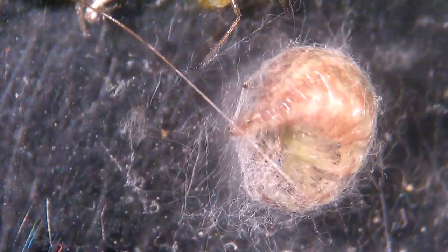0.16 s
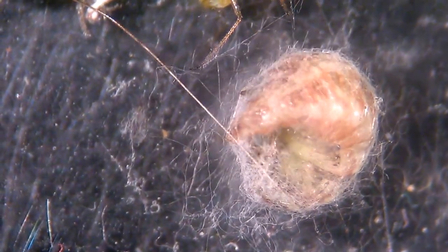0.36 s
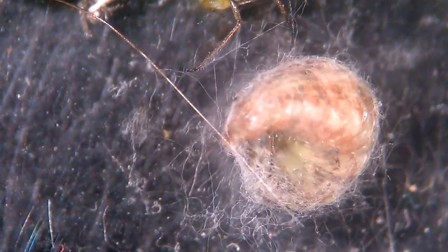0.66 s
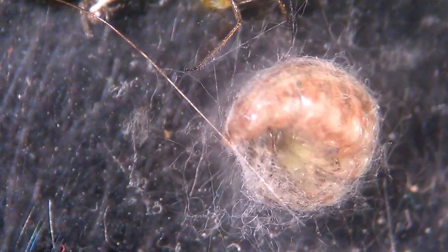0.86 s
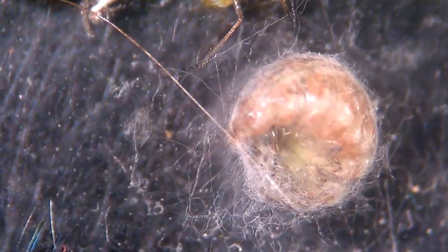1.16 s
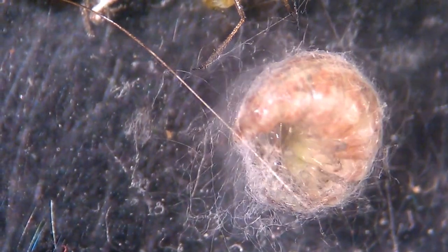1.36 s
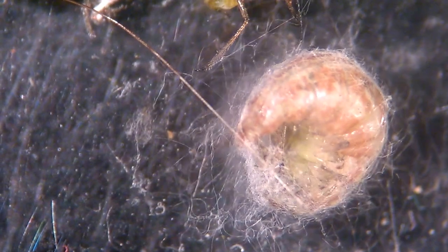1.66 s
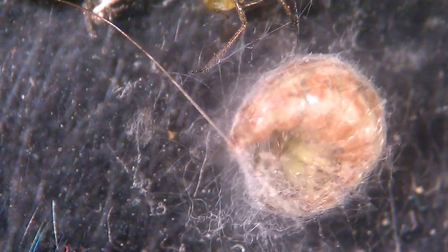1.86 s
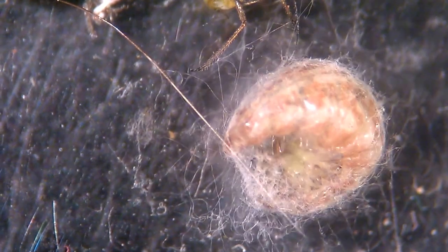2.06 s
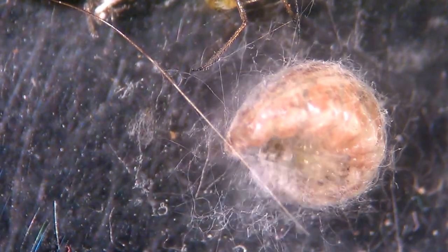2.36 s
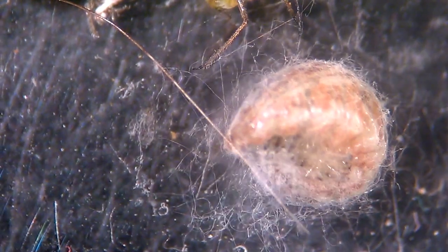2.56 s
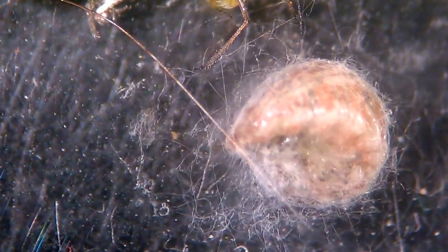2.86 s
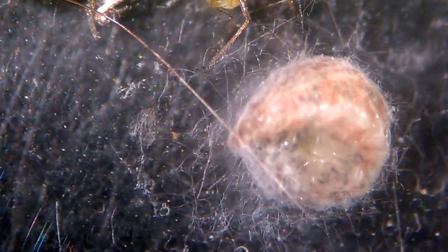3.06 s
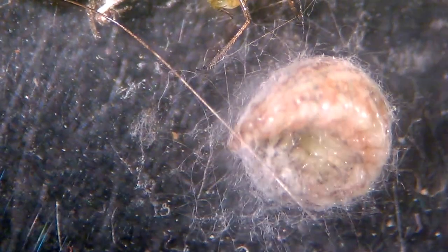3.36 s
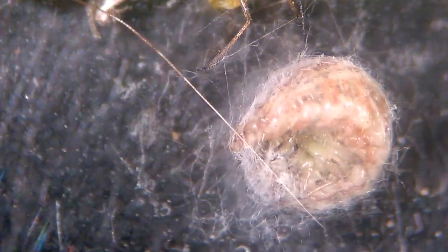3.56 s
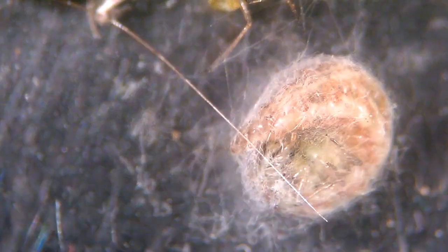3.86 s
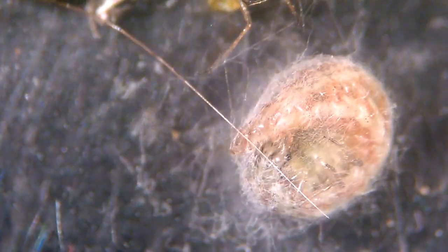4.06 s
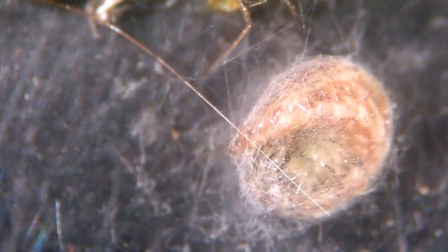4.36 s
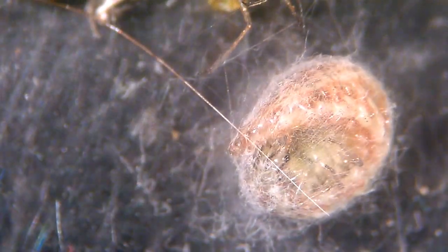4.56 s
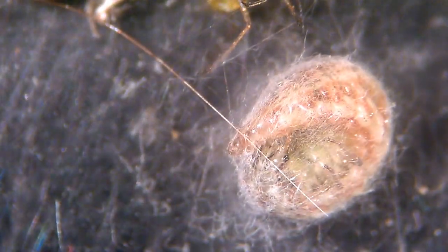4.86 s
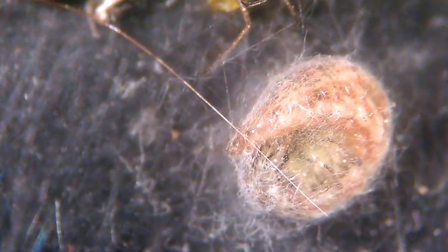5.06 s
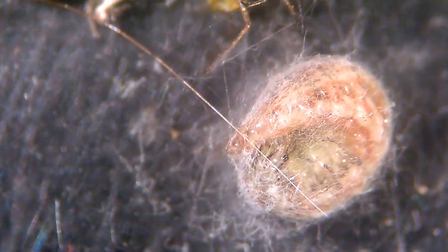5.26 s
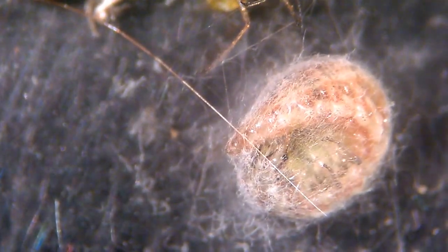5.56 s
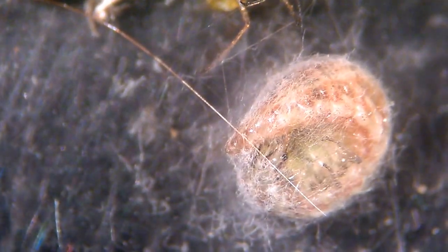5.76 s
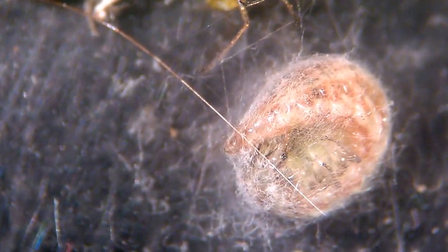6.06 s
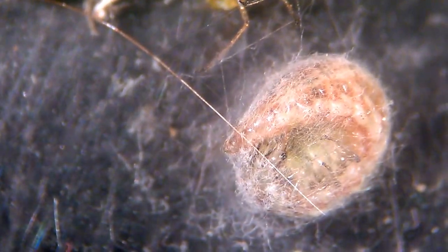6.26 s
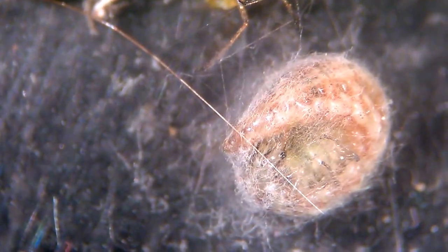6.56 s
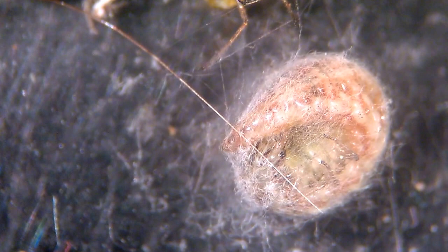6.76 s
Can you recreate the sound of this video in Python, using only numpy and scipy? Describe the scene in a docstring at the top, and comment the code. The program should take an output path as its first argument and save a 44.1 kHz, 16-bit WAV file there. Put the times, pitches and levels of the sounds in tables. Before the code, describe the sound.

A low electrical fan hum with a slow throb, under gusty air that flutters and whistles faintly through a casing in a quiet room.

```python
"""Electrical equipment hums in a quiet room for about seven seconds. From the start a five-blade fan on a
mains motor sings multiples of its shaft speed mixed with the magnetic pull, and a second motor throbs against it.
Gusty air rushes and whistles through the casing; a faint rustle, made of filtered noise, comes and goes.
The fan speeds up slightly from about 2 s. At 3.8 s there is one short rising swish, and the whistle
peaks just after 4 s. Steady air noise, ringing panels and faint hiss lie under everything."""
import sys
import numpy as np
from scipy import signal
from scipy.fft import rfft, irfft, next_fast_len
from scipy.io import wavfile
from scipy.ndimage import uniform_filter1d, map_coordinates

SR = 44100
rng = np.random.default_rng(int(sys.argv[2]) if len(sys.argv) > 2 else 0)


def dump_mix(stems):
    """Bounce the given channels to the path in sys.argv[1] as a 16-bit WAV at rate SR."""
    frames = np.atleast_2d(stems).T  # one column per channel
    limited = np.clip(frames, -1, 1)  # hard clip at full scale
    pcm = np.round(limited * 32767).astype(np.int16)
    wavfile.write(sys.argv[1], SR, pcm)


N = 305083  # length in samples

# How fast the fan shaft turns: start_s, speed_turns_per_s
FAN_SPEED = [(0, 45.119), (1, 45.119), (2, 45.124), (3, 45.141), (4, 45.183), (5, 45.212), (6, 45.196),
             (7, 45.204)]


def motors():
    """Two motors: adding up the shaft speed gives the fan's angle, which times its tones and its shake."""
    turns = np.cumsum(curves(FAN_SPEED)[0]) / SR
    return fan_tones(turns) + rotor_shake(turns)


PULL_HZ = 99.99  # magnetic pull, twice the mains frequency
# Tones of the fan: shaft_multiple, pull_multiple (both plain numbers), level_db
FAN_TONES = [(5, 0, -55.9), (5, 1, -57.4), (7, 0, -71.4), (3, 1, -72.4), (0, 1, -72.5), (9, -1, -73.8),
             (10, 0, -75.4), (6, 0, -77), (4, 0, -77.1), (2, 1, -78.4), (1, 2, -78.7), (-1, 3, -81.1),
             (11, -1, -82.4), (15, 0, -82.6), (9, 1, -83), (0, 3, -83.3), (-1, 2, -84.8), (3, 0, -87.4)]


def fan_tones(turns):
    """Blades and magnetic pull act on each other, so tones sit at sums and differences of their multiples."""
    t = np.arange(N) / SR
    hum = 0
    for shaft_multiple, pull_multiple, level_db in FAN_TONES:
        cycles = shaft_multiple * turns + pull_multiple * PULL_HZ * t + rng.random()
        hum = hum + amp(level_db + 0.44 * wobble(5.17)) * np.sin(2 * np.pi * cycles)
    return np.sqrt(2) * hum


MOTOR_HZ = 46.874  # turns per second of the second motor


def rotor_shake(turns):
    """Each rotor is heavier on one side and shakes once a turn; the two close speeds beat as a slow throb."""
    t = np.arange(N) / SR
    lead = .39  # turns by which the fan's heavy side starts ahead of the motor's
    fan = amp(-65.0 + 0.43 * wobble(2)) * np.sin(2 * np.pi * (turns + lead))
    motor = amp(-51.5 + 0.25 * wobble(2.2)) * np.sin(2 * np.pi * MOTOR_HZ * t)
    return np.sqrt(2) * (fan + motor)


LOCK_STEADIES = .4  # share of the flutter that a strong flow irons out
# Strength of the gusty air, given as the whistle's level before flutter: start_s, level_db
AIR_FLOW = [(0, -66), (0.2, -61), (0.47, -68), (0.59, -61), (0.71, -69), (0.83, -61), (1.13, -71),
            (1.37, -60), (2.0, -66), (2.6, -61.5), (3.15, -72), (3.55, -57.5), (3.82, -65.5), (4.03, -54.5),
            (4.3, -63), (4.66, -56), (4.8, -68), (5.17, -62.5), (5.38, -71), (5.53, -61), (6.0, -67),
            (6.1, -60.5), (6.25, -66), (6.4, -62), (6.7, -67.5), (6.82, -58.5), (6.92, -58.5)]


def airflow():
    """One gusty flow drives the whistle and the lower rush with a shared flutter; the upper rush has its own."""
    flow_db, = curves(AIR_FLOW)
    # 0 is a weak flow, 1 a strong one, averaged over a quarter of a second
    strength = np.clip((uniform_filter1d(flow_db, size=SR // 4) + 66) / 8, 0, 1)
    beat = (1 - LOCK_STEADIES * strength) * flutter()
    return whistle(flow_db, strength, beat) + lower_rush(flow_db, beat) + upper_rush()


WHISTLE_FLUTTER_DB = 2.5  # depth
# Breathy part of the whistle: pitch_hz, width_hz, level_db (relative)
WHISTLE_BREATH = [(905, 18, -10), (923, 77, -2)]


def whistle(flow_db, strength, beat):
    """A strong whistle locks into a cleaner, lower tone; a weak one is breathy, higher and wanders."""
    pitch_hz = 921 - 16 * strength + (11 - 7 * strength) * wobble(20)
    tone = np.sqrt(2) * np.sin(2 * np.pi * np.cumsum(pitch_hz) / SR)
    locked = .4 + .4 * strength  # share of the power in the clean tone
    sound = np.sqrt(locked) * tone + np.sqrt(1 - locked) * resonant(WHISTLE_BREATH)
    return amp(flow_db + WHISTLE_FLUTTER_DB * beat) * sound


CALM_DB = -64  # the usual whistle level
LOWER_DB, LOWER_FOLLOWS = -66, 0.52  # level at usual flow; dB change per dB of flow
LOWER_FLUTTER_DB = 2  # depth
# Lower resonances of the casing: pitch_hz, width_hz, level_db (relative)
LOWER_CASING = [(1107.4, 127, 2.5), (1254, 157, -12)]


def lower_rush(flow_db, beat):
    """Air noise rings the casing's lower resonances, about half as responsive to the flow as the whistle."""
    level_db = LOWER_DB + LOWER_FOLLOWS * (flow_db - CALM_DB) + LOWER_FLUTTER_DB * beat
    return amp(level_db) * patchy(resonant(LOWER_CASING), depth_db=0.7)


UPPER_FLUTTER_DB = 1.66  # depth
# Upper resonances of the casing: pitch_hz, width_hz, level_db (relative)
UPPER_CASING = [(1680, 88, -8), (1818, 100, -4), (1913, 163, 0)]
# Level of the upper rush before flutter: start_s, level_db
UPPER_RUSH_LEVEL = [(0, -64.5), (0.48, -67.5), (0.62, -63), (0.76, -67), (0.9, -65), (1.13, -67),
                    (1.7, -65), (2.3, -67), (2.85, -64.5), (3.0, -66.5), (3.7, -63.5), (3.87, -69.5),
                    (4.1, -62.5), (4.55, -66), (5.45, -65), (5.57, -63.5), (5.99, -67), (6.12, -62.5),
                    (6.3, -65.5), (6.78, -63), (6.92, -68)]


def upper_rush():
    """Air noise rings the casing's upper resonances, rising and falling on its own."""
    level_db = curves(UPPER_RUSH_LEVEL)[0] + UPPER_FLUTTER_DB * flutter()
    return amp(level_db) * patchy(resonant(UPPER_CASING), depth_db=0.35)


RUSTLE_DB, RUSTLE_FLUTTER_DB = -73.5, 1.4  # steady level; flutter depth
# Swells of the rustle over its steady level: centre_s, width_s, rise_db
RUSTLE_SWELLS = [(0.9, 0.14, 4), (1.5, 0.4, 2), (3.72, 0.31, 6), (4.15, 0.33, 5.5), (4.58, 0.2, 3.5),
                 (5.3, 0.3, 3.5), (5.76, 0.39, 5.5)]
# Bands of noise that color the rustle: pitch_hz, width_hz, level_db (relative)
RUSTLE_BANDS = [(658, 350, -2.5), (2183, 530, 0), (2680, 460, -4)]


def rustle():
    """A patchy hiss made of noise in broad bands; smooth swells lift it now and then."""
    t = np.arange(N) / SR
    swells_db = sum(rise_db * np.exp(-(2 * (t - centre_s) / width_s) ** 2)
                    for centre_s, width_s, rise_db in RUSTLE_SWELLS)
    level_db = RUSTLE_DB + swells_db + RUSTLE_FLUTTER_DB * flutter()
    return amp(level_db) * patchy(resonant(RUSTLE_BANDS), depth_db=1.5)


# One short airy swish: start_s, length_s, start_hz, end_hz, level_db (at its middle)
RISING_SWISH = (3.8, .1, 2290, 2690, -68)


def swish():
    """A gliding tone made rough by fast random level changes, which spread it into a narrow band of noise."""
    start_s, length_s, start_hz, end_hz, level_db = RISING_SWISH
    progress = np.clip((np.arange(N) / SR - start_s) / length_s, 0, 1)
    pitch_hz = start_hz + (end_hz - start_hz) * progress
    glide = np.sin(2 * np.pi * np.cumsum(pitch_hz) / SR)
    return amp(level_db) * np.sin(np.pi * progress) * unit((1 + wobble(260)) * glide)


# Color of the broad air noise and microphone hiss: pitch_hz, level_db (relative, per Hz)
AIR_COLOR = [(20, 2), (35, -1), (60, 1.5), (120, -8.5), (260, -1.5), (350, -8), (600, -14.5), (850, -9),
             (1200, -10), (1500, -22.5), (2500, -17.5), (3800, -27.5), (4800, -25), (7800, -33.5),
             (9600, -38.5), (15500, -37.5)]


def air_and_hiss():
    """Steady air noise and faint microphone hiss: random noise shaped by one smooth color curve."""
    hz, db = np.transpose(AIR_COLOR)
    air = unit(filtered(rng.standard_normal(N), lambda f: amp(np.interp(np.log(f + 1), np.log(hz), db))))
    return amp(-62.5) * patchy(air, depth_db=0.96)


# Panels that steady air noise rings: pitch_hz, width_hz, level_db
RINGING_PANELS = [(222.4, 25, -70.5), (270, 13, -76.5), (317.5, 22, -72), (395, 14, -75.5), (433, 20, -82),
                  (479.3, 28, -78.5), (534, 27, -82.5), (3302, 270, -82), (6090, 120, -90),
                  (6530, 110, -93), (8000, 500, -97.5), (10720, 350, -96)]


def panels():
    """Each panel rings at its own pitch, so noise comes out as a narrow band around it."""
    return sum(amp(level_db) * resonant([(pitch_hz, width_hz, 0)])
               for pitch_hz, width_hz, level_db in RINGING_PANELS)


FLUTTER_PER_S, FLUTTER_WANDERS = 8, .35  # usual beats a second; share by which the rate typically strays


def flutter():
    """An uneven fast beat swinging either side of 0, now deeper, now shallower, of rms about 1."""
    rate = FLUTTER_PER_S * (1 + FLUTTER_WANDERS * wobble(5))
    beat = np.sin(2 * np.pi * (np.cumsum(rate) / SR + rng.random()))
    return np.sqrt(2) * beat * (1 + .3 * wobble(4))


def patchy(x, depth_db):
    """x under drifting patches of random gain over time and frequency, then set to rms 1."""
    spectrum = signal.stft(x, nperseg=512)[2]
    across_pitch = uniform_filter1d(rng.standard_normal(spectrum.shape), size=5, axis=0)
    patches = unit(uniform_filter1d(across_pitch, size=12, axis=1))
    return unit(signal.istft(spectrum * amp(depth_db * patches), nperseg=512)[1][:N])


def resonant(modes):
    """Noise of rms 1 through steep-sided resonances whose powers add."""
    def gain(f):
        power = sum(amp(2 * db) / (1 + (2 * (f - hz) / width) ** 2) ** 2 for hz, width, db in modes)
        return np.sqrt(power)
    return unit(filtered(rng.standard_normal(N), gain))


def filtered(x, response):
    """x with each frequency turned up or down by response."""
    m = next_fast_len(N + 8192)  # room for the filter to ring out
    return irfft(rfft(x, m) * response(np.fft.rfftfreq(m, 1 / SR)), m)[..., :N]


def wobble(rate):
    """A smooth random curve through rate random points a second."""
    points = rng.standard_normal(int(N * rate / SR) + 4)
    return map_coordinates(points, [np.arange(N) * rate / SR])


def curves(rows):
    """One value per sample for each column after the time, joined by straight lines."""
    s, *cols = np.transpose(rows)
    return [np.interp(np.arange(N) / SR, s, c) for c in cols]


def unit(x):
    """x at rms 1."""
    return x / np.sqrt(np.mean(x ** 2))


def amp(db):
    """Gain of a level in dB."""
    return 10 ** (np.asarray(db) / 20)


def scene():
    """All sources added together, one channel."""
    return (motors() + airflow() + rustle() + swish() + air_and_hiss() + panels())[None]


TOP_HZ = 15745  # band limit of the recorder


def record(dry):
    """The recorder keeps almost nothing from its band limit up."""
    return filtered(dry, lambda hz: (hz < TOP_HZ) + 1e-5)


dry = scene()
out = record(dry)
dump_mix(out)
```